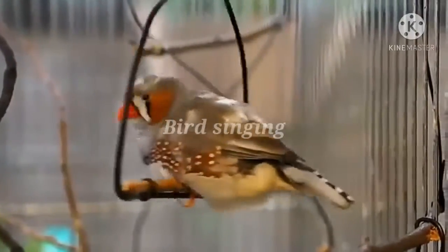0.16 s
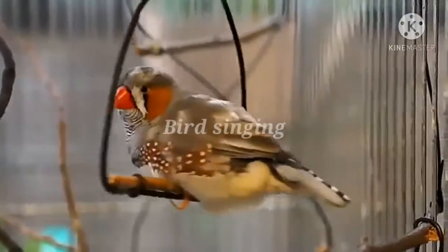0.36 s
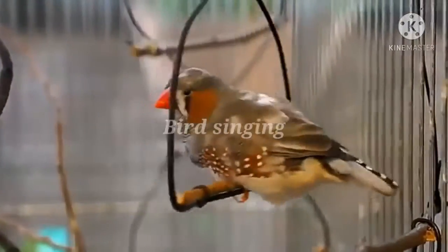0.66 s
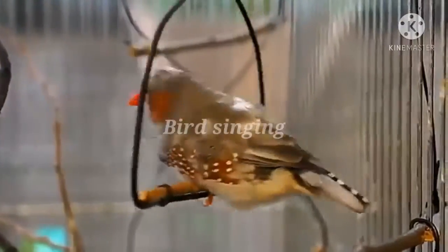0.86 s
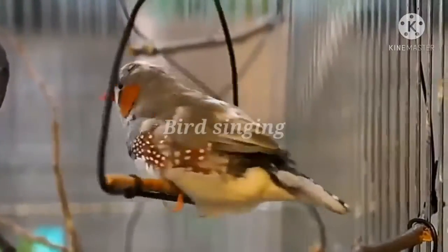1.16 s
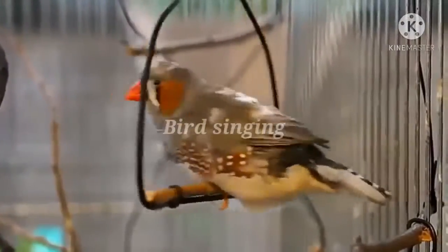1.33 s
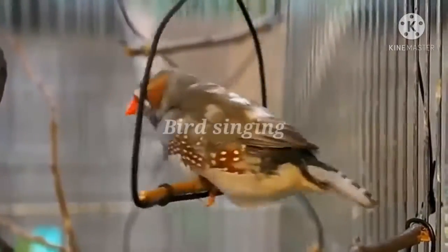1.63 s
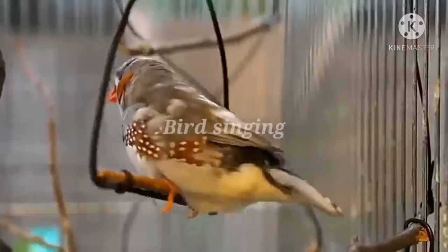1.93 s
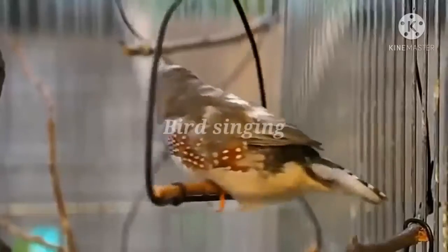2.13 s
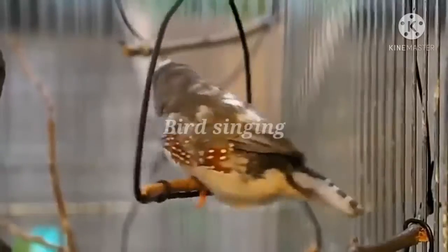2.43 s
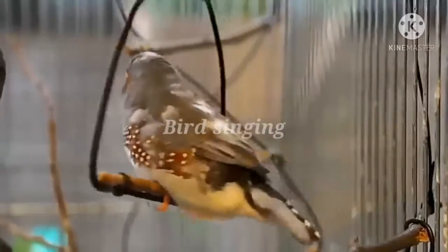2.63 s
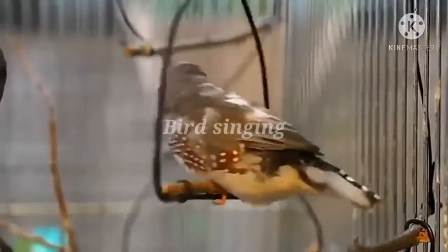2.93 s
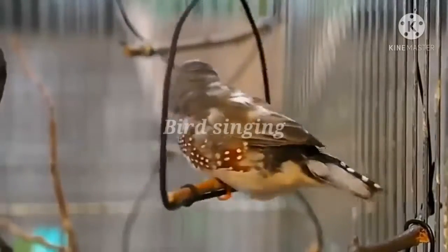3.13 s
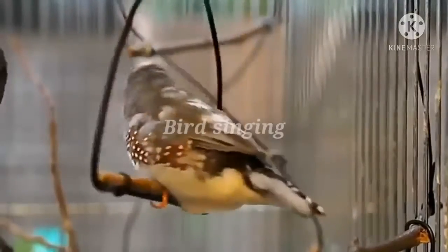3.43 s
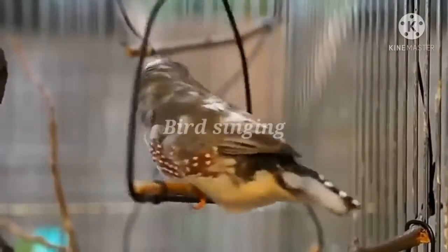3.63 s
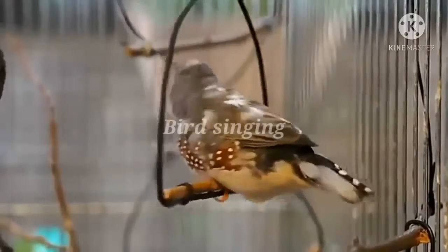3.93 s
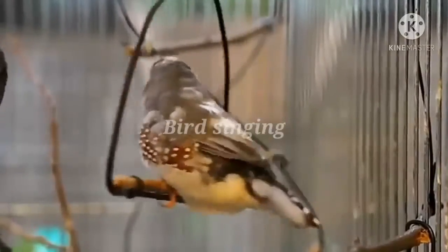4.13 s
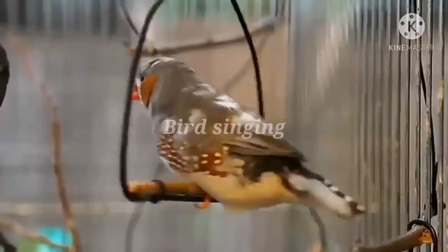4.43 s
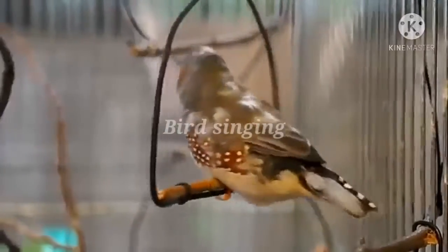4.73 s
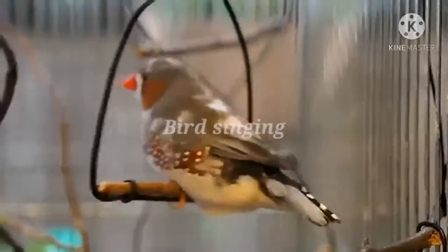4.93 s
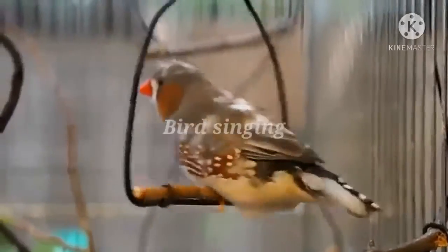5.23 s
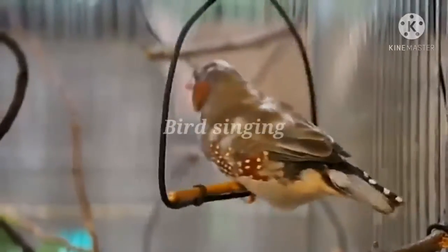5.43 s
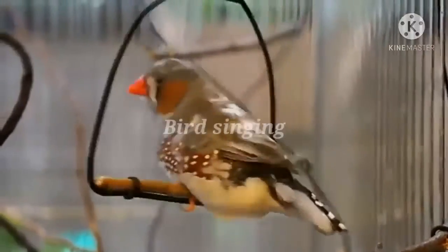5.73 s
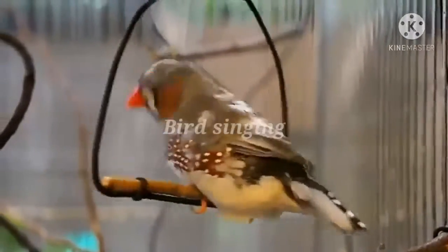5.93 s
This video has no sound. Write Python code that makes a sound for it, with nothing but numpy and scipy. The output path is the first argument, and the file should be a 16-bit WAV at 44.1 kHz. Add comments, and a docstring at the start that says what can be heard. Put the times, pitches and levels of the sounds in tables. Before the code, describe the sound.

A male zebra finch rasps softly, then sings nasal chips, plunging whistles and loud high squeaks in a cage, over a faint indoor hum.

```python
"""First you hear a faint appliance hum and soft room air; then claws tick and a male zebra finch rasps.
He sings four runs of his motif (chips, a nasal note, a plunging whistle, loud high notes), one long call,
then soft notes again. Buzzing calls overlap him. His voice is a stack of harmonics, clean or chaotic, coloured
by throat and beak. Hum is wavering tones; air, ticks and scuffs are coloured noise. Cage and small room answer."""
import sys
import numpy as np
from scipy import signal
from scipy.fft import rfft, irfft, next_fast_len
from scipy.io import wavfile

SR = 44100
rng = np.random.default_rng(int(sys.argv[2]) if len(sys.argv) > 2 else 0)


def to_wav(sig):
    """Store sig (one row per channel, or 1-D mono) as 16-bit WAV at the path in sys.argv[1].

    Samples outside -1..1 are clipped; the rate is SR.
    """
    pcm = np.clip(np.atleast_2d(sig), -1, 1) * 32767
    pcm = np.round(pcm).astype(np.int16)
    wavfile.write(sys.argv[1], SR, pcm.T)  # frames by channels


N = 268128
EDGE_HZ = 15500  # top of the sound's frequency range


def amp(db):
    """Turns decibels into gain."""
    return 10 ** (np.asarray(db) / 20)


def unit(x):
    """Scales a signal to an rms of 1."""
    return x / np.sqrt(np.mean(x ** 2) + 1e-20)


def read(points, hz):
    """Reads a table between its points, on a log-frequency axis."""
    point_hz, value = np.transpose(points)
    return np.interp(np.log(hz + 1), np.log(point_hz + 1), value)


def add(mix, start_s, sound):
    """Mixes a sound in at its start time, cut off at the end of the mix."""
    part = mix[..., max(round(start_s * SR), 0):][..., :sound.shape[-1]]
    part += sound[..., :part.shape[-1]]


def noise(colour, size):
    """Random noise filtered to the given spectrum, with an rms of 1."""
    spectrum = rfft(rng.standard_normal(size))
    gain = amp(read(colour, np.fft.rfftfreq(size, 1 / SR)))
    return unit(irfft(spectrum * gain, size))


def wander(hz, size):
    """Random drift, mostly no faster than about hz."""
    length = next_fast_len(size + 4096)
    f = np.fft.rfftfreq(length, 1 / SR)
    slow = rfft(rng.standard_normal(length)) * np.exp(-(f / hz) ** 2)
    return unit(irfft(slow, length))[:size]


def pair(a, b, likeness):
    """Turns two unrelated signals into a left and a right that are partly alike."""
    same = np.clip(read(likeness, np.fft.rfftfreq(len(a), 1 / SR)), 0, 1)
    mid = rfft(a) * np.sqrt((1 + same) / 2)
    side = rfft(b) * np.sqrt((1 - same) / 2)
    return irfft(np.array([mid + side, mid - side]), len(a))


# Tones of the appliance hum: f/Hz, level/dB, wavering share
HUM_TONES = [(239.4, -52, 0.32), (481, -63, 1), (968, -64.5, 0.42)]
# Colour of the room air, before AIR_DB sets its loudness: f/Hz, relative level per Hz/dB
AIR_COLOUR = [(15, -56), (25, -21), (43, -16), (169, -9), (233, -8), (331, -10.5), (482, -13.5),
              (614, -13.5), (1020, -14.5), (1530, -21.5), (1900, -19.5), (3720, -24), (7910, -28.5),
              (14300, -34.5), (15500, -33)]
# How alike the air sounds in both ears: f/Hz, left-right likeness (0 to 1)
AIR_LIKENESS = [(40, 0.56), (150, 0.73), (700, 0.84), (2000, 0.62), (6000, 0.094), (14000, 0.11)]
AIR_DB = -49


def background(waver_hz=9):
    """An appliance hums in tones of wavering strength and phase, over the soft rush of room air."""
    t = np.arange(N) / SR
    hum = np.zeros(N)
    for hz, db, share in HUM_TONES:
        drift = 1 + share * (wander(waver_hz, N) + 1j * wander(waver_hz, N)) / np.sqrt(2)
        tone = (drift * np.exp(2j * np.pi * hz * t)).real
        hum += amp(db) * unit(tone)
    air = pair(noise(AIR_COLOUR, N), noise(AIR_COLOUR, N), AIR_LIKENESS)
    return hum + amp(AIR_DB) * air


# First echoes off cage tray and walls: delay t/s, left gain, right gain
ECHOES = [(.0011, 0.092, 0.094), (.0023, 0.11, 0.2), (.0072, 0.18, 0.12)]
# Time the room's tail takes to fall by 60 dB: f/Hz, t/s
TAIL_T60 = [(200, 0.97), (1500, 0.37), (4000, 0.32), (8000, 0.38), (15000, 0.36)]
# How alike the tail is in both ears: f/Hz, left-right likeness (0 to 1)
TAIL_LIKENESS = [(300, 0.97), (1400, 1), (2800, 0.91), (6000, 0.69), (12000, 0.13)]
TAIL_DB = -6


def room(x, onset_s=0.002):
    """Direct sound, a few near echoes, and a short tail that fades at its own speed in each band."""
    hz, t, cells = signal.stft(rng.standard_normal((2, SR // 2)), SR, nperseg=256)
    fading = amp(-60 * t / read(TAIL_T60, hz)[:, None])
    a, b = signal.istft(cells * fading, SR, nperseg=256)[1]
    rise = np.minimum(np.arange(len(a)) / SR / onset_s, 1) ** 2
    tail = pair(a, b, TAIL_LIKENESS) * rise
    response = amp(TAIL_DB) * tail / np.linalg.norm(tail[0])
    response[:, 0] += 1  # direct sound
    for delay_s, left, right in ECHOES:
        response[:, round(delay_s * SR)] += [left, right]
    return signal.fftconvolve(x, response, axes=1)[:, :N]


# Claw ticks on the swing, levels before the room: t/s, level/dB, decay/s
TICKS = [(0.665, -45, 0.0025), (1.03, -40, 0.0019), (1.193, -39, 0.0031), (5.294, -37.5, 0.014)]
# Colour of a tick: f/Hz, relative level/dB
TICK_COLOUR = [(300, -20), (1500, 6), (5000, 3.5), (8500, 9.5), (15000, -14)]
# Soft scuffs as he shifts on the swing, levels before fading in and out: t/s, length/s, level/dB
SCUFFS = [(1.582, 0.21, -39), (2.782, 0.11, -39), (3.598, 0.22, -45.5), (4.293, 0.1, -41),
          (5.271, 0.15, -45.5)]
# Colour of a scuff: f/Hz, relative level/dB
SCUFF_COLOUR = [(60, -22), (150, -5.5), (350, -4.5), (700, -9.5), (2000, -7.5), (6000, -21), (15000, -28)]


def swing():
    """Claws tick on the perch as dying noise; feet scuff as noise that swells and fades."""
    out, t = np.zeros(N), np.arange(4096) / SR
    for start_s, db, decay_s in TICKS:
        add(out, start_s, amp(db) * noise(TICK_COLOUR, len(t)) * np.exp(-t / decay_s))
    for start_s, length_s, db in SCUFFS:
        size = int(length_s * SR)
        add(out, start_s, amp(db) * noise(SCUFF_COLOUR, size) * np.hanning(size))
    return out


# Strength of the scatter off the cage wires, against the direct sound: f/Hz, level/dB
SCATTER = [(300, -32), (1200, -49), (2400, -13), (4500, -4.5), (8000, -6.5), (15000, -3)]
# How alike the scatter is in both ears: f/Hz, left-right likeness (0 to 1)
SCATTER_LIKENESS = [(300, .98), (1400, 1), (2400, 0.3), (6000, .05), (12000, .02)]


def cage(x, decay_s=0.0034, size=1024):
    """Wires and twigs scatter the treble, anew for each turn of the head (every note); energy is kept."""
    a, b = rng.standard_normal((2, size)) * np.exp(-np.arange(size) / SR / decay_s)
    scatter = rfft(pair(a, b, SCATTER_LIKENESS)) / np.linalg.norm(a)
    gain = amp(read(SCATTER, np.fft.rfftfreq(size, 1 / SR)))
    paths = (1 + gain * scatter) / np.sqrt(1 + gain ** 2)
    response = irfft(paths, size) * np.hanning(2 * size)[size:]
    out = signal.fftconvolve(x[None], response, axes=1)
    return out * np.sqrt(2) * np.linalg.norm(x) / np.linalg.norm(out)


# Kinds of syllable, each one push of air; columns are named settings, before a note's stretch and pitch factor:
# times t/s (hold, fall, rise, attack), pitch f/Hz (start, top, end), throat resonance f/Hz (early, late),
# level/dB (swell, end, dip), roughness (0 clean, 1 chaotic), curves of the fall (sag: pitch, fade: level)
RASP = dict(hold_s=.01, fall_s=.048, start_hz=624, top_hz=900, end_hz=454.4, rise_s=.004, sag=.45, attack_s=0.013, end_db=-2, dip_db=-3, rough=.5, end_rough=0.28, throat_hz=2800, late_throat_hz=3000)
CHIP = dict(hold_s=.02, fall_s=0.014, start_hz=672.6, top_hz=624, end_hz=515, sag=1.3, attack_s=0.0036, swell_db=7, end_db=-5.5, rough=0.14, end_rough=0.13, throat_hz=2330, late_throat_hz=2510)
NASAL = dict(hold_s=.058, fall_s=.014, start_hz=455.3, top_hz=487, end_hz=431, rise_s=0.0295, sag=1.16, attack_s=.012, swell_db=7, end_db=-0.5, rough=0.076, end_rough=0.092, throat_hz=2570, late_throat_hz=2880)
BUZZ = dict(hold_s=.048, fall_s=0.033, start_hz=494, top_hz=559.5, end_hz=518, rise_s=.016, sag=1.29, attack_s=0.0021, swell_db=4.5, end_db=1.5, rough=0.021, end_rough=.15, throat_hz=3180, late_throat_hz=3220)
MEW = dict(hold_s=0.02, fall_s=0.017, start_hz=458.6, top_hz=451.6, end_hz=420, sag=1.5, attack_s=.008, swell_db=2, end_db=-13, rough=0.12, end_rough=.12, throat_hz=3050, late_throat_hz=3100)
PLUNGE = dict(hold_s=.007, fall_s=.036, start_hz=3453, top_hz=3604, end_hz=764, sag=.56, attack_s=0.00054, end_db=-14.5, fade=0.31, rough=.16, end_rough=0.37, throat_hz=3300, late_throat_hz=870)
HIGH = dict(hold_s=.071, fall_s=.038, start_hz=987.4, top_hz=1207.3, end_hz=601, rise_s=.012, sag=.52, attack_s=0.0038, swell_db=2.5, end_db=-7, dip_db=2, onset_rough=0.56, rough=0.046, end_rough=0.79, throat_hz=2170, late_throat_hz=3420)
SHRILL = dict(hold_s=.063, fall_s=.05, start_hz=929.5, top_hz=1186.7, end_hz=588, rise_s=.008, sag=.55, attack_s=0.0078, end_db=-9, dip_db=3.5, onset_rough=1, rough=0.082, end_rough=1, throat_hz=4700, late_throat_hz=3950)
CHIRP = dict(hold_s=0.0201, fall_s=0.0102, start_hz=660, top_hz=576, end_hz=517, rise_s=.02, sag=1.8, attack_s=0.0028, swell_db=8.5, end_db=-10, rough=.17, end_rough=0.34, throat_hz=4050, late_throat_hz=4170)
SQUEAK = dict(hold_s=0.0033, fall_s=0.0045, start_hz=2010, top_hz=2170, end_hz=2250, attack_s=0.0011, end_db=-10, rough=0.15, end_rough=.4, throat_hz=6100, late_throat_hz=6300)
WHISTLE = dict(hold_s=.0065, fall_s=.005, start_hz=5100, top_hz=6734, end_hz=4800, rise_s=0.00308, sag=1.22, attack_s=0.0011, swell_db=4.5, end_db=-11.5, rough=0.016, end_rough=.15, throat_hz=6160, late_throat_hz=6200)
GRUNT = dict(hold_s=.008, fall_s=0.018, start_hz=520, top_hz=650, end_hz=364, rise_s=0.0036, attack_s=.008, end_db=-2, rough=.35, end_rough=0.34, throat_hz=2900, late_throat_hz=3340)
# The voice catches, the throat shifts, the air stops; all before a note's stretch
CATCH_S, THROAT_MOVE_S, RELEASE_S = 0.0077, 0.048, 0.0014


def gesture(hold_s, fall_s, start_hz, top_hz, end_hz, attack_s, end_db, rough, end_rough,
            throat_hz, late_throat_hz, rise_s=0.01024, sag=.72, swell_db=0, fade=1, dip_db=0, onset_rough=0):
    """Attack, hold, fall: as air gives out, pitch, level and roughness move to their end values.

    Rows: t/s, f/Hz, level/dB, roughness, throat f/Hz."""
    t = np.linspace(0, hold_s + fall_s, 200)
    held = np.minimum(t / hold_s, 1)
    fall = np.clip((t - hold_s) / fall_s, 0, 1)
    settling_hz = top_hz + (start_hz - top_hz) * np.exp(-t / rise_s)
    hz = settling_hz * (end_hz / top_hz) ** (fall ** sag)
    air = np.clip(np.minimum(t / attack_s, (t[-1] - t) / RELEASE_S), 1e-2, 1)
    level_db = 20 * np.log10(air) + swell_db * (held - 1)
    level_db += end_db * fall ** fade - dip_db * np.sin(np.pi * fall) ** 2
    catch = onset_rough * np.exp(-(t / CATCH_S) ** 2)
    roughness = rough + catch + (end_rough - rough) * fall ** sag
    moved = np.sin(np.pi / 2 * np.minimum(t / THROAT_MOVE_S, 1)) ** 2
    throat = throat_hz + (late_throat_hz - throat_hz) * moved
    return np.transpose([t, hz, level_db, roughness, throat])


# The long call, with the same columns as the kinds of syllable: times t/s, pitch f/Hz, level/dB, roughness
CALL = dict(hold_s=.16, fall_s=.026, start_hz=708, top_hz=891, end_hz=807, rise_s=.024, sag=2.1, attack_s=.024, swell_db=1, end_db=-4.5, onset_rough=0.76, rough=0.09, end_rough=0.29, throat_hz=3000, late_throat_hz=3670)
# Late in the call the voice cracks and turns rough; times are before the note's stretch
CRACK_S, CRACK_SPREAD_S, CRACK_ROUGH = 0.118, .004, 0.2
QUAVER_HZ, QUAVER_DEPTH = 30, .018  # before stretch; depth is the share of pitch at the end of the hold


def long_call():
    """A held note whose pitch quavers more and more; late on, the voice cracks into roughness."""
    t, hz, level_db, rough, throat = gesture(**CALL).T
    growth = QUAVER_DEPTH * t / CALL["hold_s"]
    quaver = growth * np.cos(2 * np.pi * QUAVER_HZ * (t - CALL["hold_s"]))
    cracked = (1 + np.tanh((t - CRACK_S) / CRACK_SPREAD_S)) / 2
    return np.transpose([t, hz * (1 + quaver), level_db, rough + CRACK_ROUGH * cracked, throat])


# Colour of windpipe and beak in each posture: f/Hz, relative level/dB
SHUT = [(450, -40), (850, 2.5), (1400, -12.5), (2100, 1.5), (3100, -4), (4200, -6.5), (5500, -8.5),
        (7500, -14), (11000, -21), (15000, -27)]
AJAR = [(500, -19.5), (1000, -4), (1450, -12), (2000, 2), (3000, -1.5), (4300, -1), (5200, -7.5),
        (7000, -19.5), (8500, -19.5), (10500, -22), (15000, -31.5)]
OPEN = [(550, -26), (820, -4.5), (1150, -8), (1500, -3.5), (2300, -2), (3600, 0.5), (4800, 2), (6200, -2),
        (7200, -10), (8400, -17.5), (9600, -17.5), (12000, -22), (15000, -34)]
WIDE = [(500, -36), (875, -9), (1750, -7.5), (2600, -1.5), (4400, 0.5), (5250, -6), (6200, -17),
        (8700, -23.5), (10000, -23.5), (12000, -35), (13500, -36), (15000, -33)]
PINCHED = [(450, -35), (900, -13), (1350, -12), (1800, -18), (2220, 5), (2650, -10.5), (3100, 4),
           (3600, -8), (5000, -16), (8000, -32), (15000, -36)]
GAPING = [(550, -40), (820, -7), (1150, -12.5), (1500, -4), (2300, -7), (3000, 7.5), (3600, -3.5),
          (4800, 1.5), (6000, -4.5), (7200, -12), (8400, -16.5), (9600, -19.5), (12000, -24.5),
          (15000, -33)]
# High notes are nearly pure: pitch f/Hz, level lost per octave of overtones/dB
PURITY = [(1150, 0), (1800, 4.5), (6000, 0.5)]
THROAT_DB, THROAT_OCTAVES = 7.5, 0.23  # height and width of the throat resonance


def syllable(rows, beak, db, stretch, pitch, bright_db, jitter=0.047, jitter_hz=700, waver=0.0093,
             shimmer=0.19, rasp=1.0, fray=0.54, fray_hz=11000, dispersion=1.34):
    """The syrinx buzzes, cleanly or chaotically; throat and beak weight its harmonics."""
    s, *columns = np.transpose(rows)
    s = np.maximum.accumulate(s) * stretch
    t = np.arange(0, s[-1], 1 / SR)
    size = len(t)
    hz, level_db, rough, throat = (np.interp(t, s, column) for column in columns)
    hz, rough = hz * pitch, np.clip(rough, 0, 1)
    unsteady = jitter * rough * wander(jitter_hz, size) + waver * wander(184, size)
    turns = np.cumsum(hz * (1 + unsteady)) / SR  # vibration cycles so far

    k = np.arange(1, int(EDGE_HZ / hz.min()) + 1)[:, None]  # harmonic numbers
    octaves = np.log2(k * hz / throat)
    throat_db = THROAT_DB * np.exp(-(octaves / THROAT_OCTAVES) ** 2)
    slope_db = (bright_db - read(PURITY, hz)) * np.log2(k)
    # single harmonics swell and fade as the throat moves
    flutter_db = 3 * np.array([wander(70, size) for _ in k])
    weight = amp(read(beak, k * hz) + throat_db + slope_db + flutter_db) * (k * hz < EDGE_HZ)
    weight /= np.sqrt((weight ** 2).sum(0) / 2)

    # in chaotic vibration each harmonic changes size and phase from cycle to cycle
    cycles = np.arange(int(turns[-1]) + 2)
    chance = rng.standard_normal((len(k), len(cycles), 2)) @ [1, 1j]
    chaos = np.array([np.interp(turns, cycles, row) for row in chance])
    # the top harmonics always fray
    share = np.clip(rough + fray * np.minimum(k * hz / fray_hz, 1) ** 2, 0, 1)
    # the windpipe shifts each harmonic a little, which blunts the pulses
    angle = 2 * np.pi * k * turns + dispersion * rng.standard_normal(k.shape)
    partials = (np.sqrt(1 - share ** 2) + rasp * share * chaos) * np.exp(1j * angle)
    voice = (weight * partials.real).sum(0) * (1 + shimmer * rough * wander(580, size))
    return voice * amp(level_db + db) * signal.windows.tukey(size, .03)


def caged(notes):
    """Mixes notes at their start times, each scattered by the cage in its own way."""
    out = np.zeros((2, N))
    for start_s, sound in notes:
        add(out, start_s, cage(sound))
    return out


# Flat buzzing calls that overlap the song, likely from a cage mate:
# t/s, level/dB, time stretch, pitch factor, brightness per octave/dB
BUZZES = [(2.11, -36, 1, 0.92, -3), (3.186, -23, 0.94, 0.98, 4.5), (3.805, -29, .75, 0.9, 3.5),
          (5.546, -41, 1, 0.92, -6), (5.72, -42, .6, .88, -7.5)]


def buzzing_calls():
    """Flat buzzes from a slightly open beak, made by the same kind of voice."""
    return caged((s, syllable(gesture(**BUZZ), AJAR, *how)) for s, *how in BUZZES)


# His motif, before each run's stretch and level:
# name, t/s from the squeak, kind of syllable, beak, level/dB, brightness per octave/dB
MOTIF = [("first chip", -.346, CHIP, SHUT, -33, -0.17), ("nasal", -.25, NASAL, AJAR, -26.5, 0.57),
         ("second chip", -.131, CHIP, SHUT, -33.5, -.5), ("chirp", -.0645, CHIRP, AJAR, -23, -.7),
         ("squeak", 0, SQUEAK, OPEN, -28.5, 1), ("whistle", .0065, WHISTLE, OPEN, -16.5, 0.74),
         ("plunge", .016, PLUNGE, OPEN, -22, -1.4), ("grunt", .046, GRUNT, AJAR, -36, 1),
         ("high", 0.11, HIGH, OPEN, -20, 1.5), ("mew", .272, MEW, PINCHED, -29, -0.94),
         ("first shrill", .338, SHRILL, GAPING, -18.5, 0),
         ("second shrill", .4855, SHRILL, GAPING, -19, 0.16)]
# The stretch of motif he sings each time:
# t/s of the squeak, first name, last name, time stretch, pitch factor, lead-in level/dB, level/dB
RUNS = [(1.7132, "first chip", "high", 1.0, 1.005, -4.5, 0.5),
        (2.404, "second chip", "second shrill", 1, 1.004, -1, 0.64),
        (3.1309, "chirp", "high", 1, 1.016, -1.5, 0.5),
        (3.841, "first chip", "second shrill", 1.004, .996, -0.5, -0.07)]


def motif_runs():
    """Each run plays part of the motif at its own pace, pitch and effort; yields (start time, sound)."""
    names = [row[0] for row in MOTIF]
    for squeak_s, first, last, stretch, pitch, lead_db, run_db in RUNS:
        part = MOTIF[names.index(first):names.index(last) + 1]
        for _, offset_s, kind, beak, db, bright_db in part:
            effort_db = lead_db if offset_s < 0 else run_db
            sound = syllable(gesture(**kind), beak, db + effort_db, stretch, pitch, bright_db)
            yield squeak_s + offset_s * stretch, sound


# Single syllables before, between and after the runs:
# t/s, kind of syllable, beak, level/dB, time stretch, pitch factor, brightness per octave/dB
SINGLES = [(.736, RASP, SHUT, -39, 0.95, 0.99, -2), (0.969, RASP, SHUT, -39, .98, 1.03, -1),
           (1.116, RASP, SHUT, -36, 1.01, 1, 0), (1.255, RASP, SHUT, -33.5, 0.98, 1.05, 0.5),
           (1.647, RASP, AJAR, -31.5, 0.86, 1.05, 4.5), (1.998, RASP, AJAR, -38, 0.4, .8, -6.5),
           (2.066, RASP, AJAR, -33, 0.37, 0.97, 0.5), (2.14, NASAL, AJAR, -29, 1.07, 1.0, -1),
           (5.598, RASP, SHUT, -34.5, .94, 1.01, 1.6), (5.74, RASP, SHUT, -33.5, 1.05, 1.02, -0.5),
           (5.864, CHIP, SHUT, -32.5, 1.02, 1.0, -2.5), (5.97, NASAL, AJAR, -29, 1.01, .99, 0)]
# The long call that ends the song: t/s, level/dB, brightness per octave/dB
LAST_CALL = (4.516, -18.5, 3.1)


def finch():
    """The bird's pushes of air: single syllables, runs of the motif and the long call."""
    notes = [(s, syllable(gesture(**kind), *how)) for s, kind, *how in SINGLES]
    notes += motif_runs()
    call_s, db, bright_db = LAST_CALL
    notes.append((call_s, syllable(long_call(), WIDE, db, 0.98, 0.99, bright_db)))
    return caged(notes)


def scene():
    """Birds and swing in the room, nearly straight ahead, over hum and room air."""
    in_room = room(swing() + buzzing_calls() + finch())
    balance_db = [[-.4], [-1.1]]  # left, right
    return background() + in_room * amp(balance_db)


def record(dry):
    """The recorder's band limit: a steep filter that removes what lies above EDGE_HZ."""
    low_pass = signal.firwin(511, EDGE_HZ, window=("kaiser", 9), fs=SR)
    return signal.oaconvolve(dry, low_pass[None], "same")


dry = scene()
out = record(dry)
to_wav(out)
```